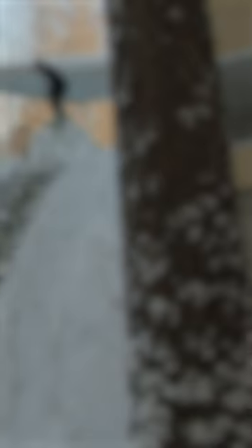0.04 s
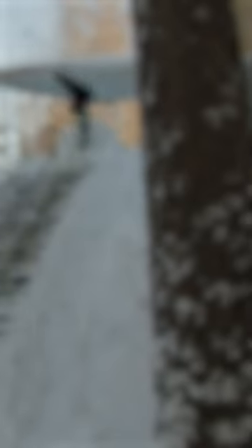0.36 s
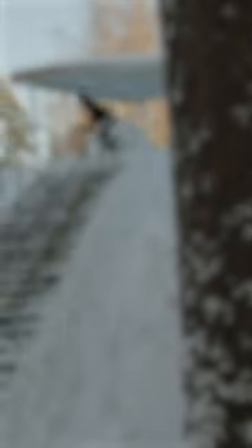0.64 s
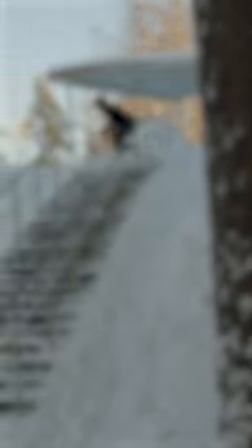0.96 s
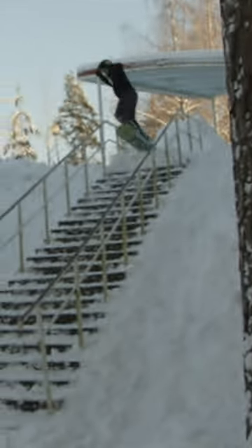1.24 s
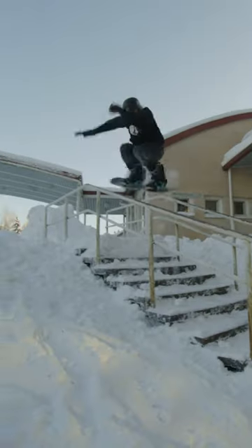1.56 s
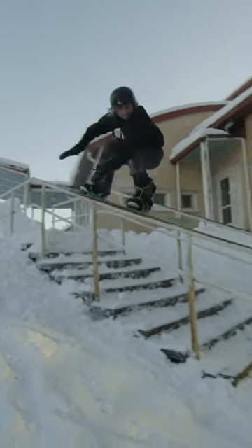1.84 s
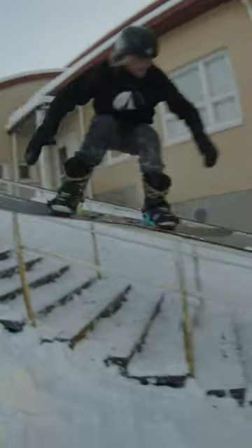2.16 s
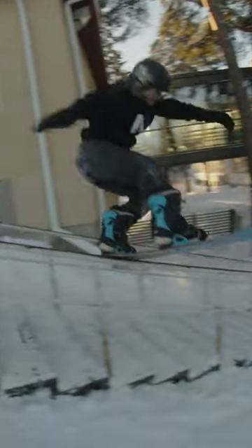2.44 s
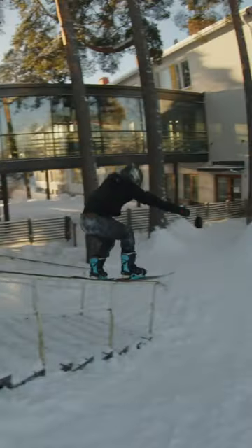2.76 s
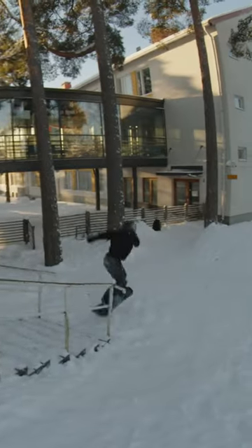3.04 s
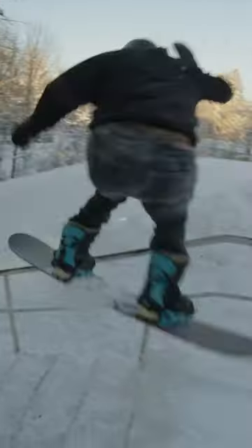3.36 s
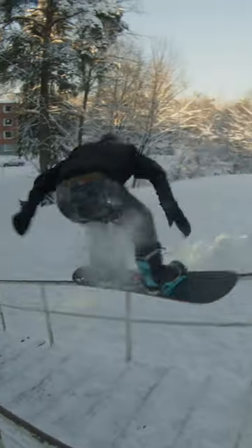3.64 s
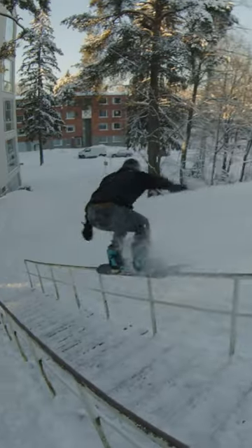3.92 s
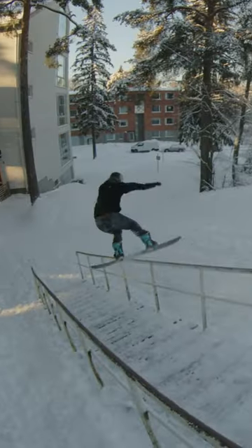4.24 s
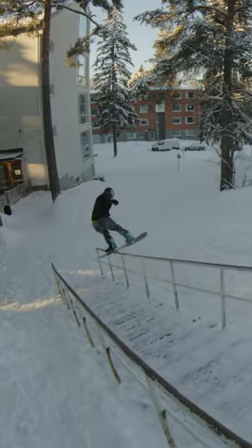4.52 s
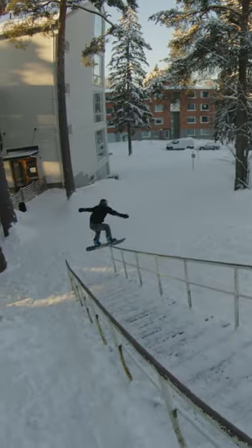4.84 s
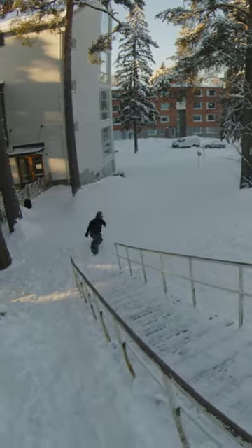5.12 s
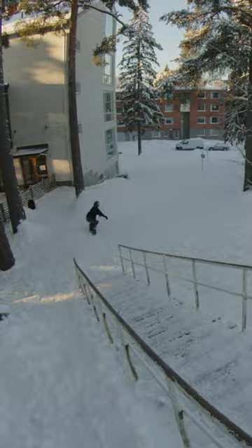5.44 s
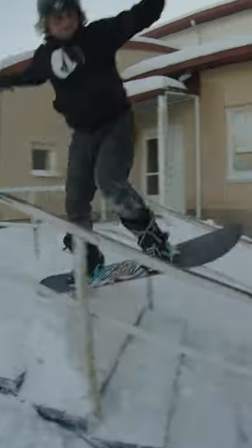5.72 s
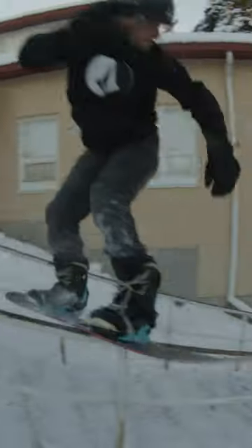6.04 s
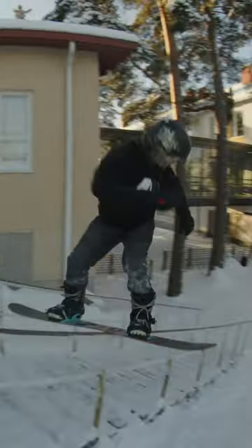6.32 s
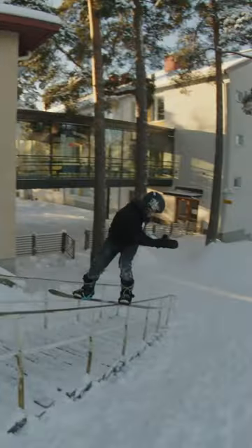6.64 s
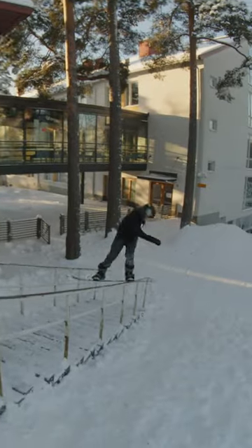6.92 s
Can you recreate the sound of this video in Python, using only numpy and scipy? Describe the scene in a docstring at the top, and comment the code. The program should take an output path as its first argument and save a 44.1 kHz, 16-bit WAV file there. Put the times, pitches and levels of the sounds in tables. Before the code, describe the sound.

A snowboard glides over snow and three times cracks onto a metal handrail and scrapes along it, twice thumping down into snow.

```python
"""A snowboarder at a steel stair handrail, heard from close by in stereo, outdoors in quiet winter air.
The board rides in over packed snow under a thin electronic whine, then cracks onto the tube, which
hums and rings while the base scrapes along it. Twice it thumps down into snow and glides away; then it
sweeps past on the ramp into a third slide. The nearest blows overload the microphone, and house fronts
give a faint echo."""
import sys
import numpy as np
from scipy import signal
from scipy.fft import rfft
from scipy.io import wavfile
from scipy.ndimage import uniform_filter1d, map_coordinates

SR = 44100
rng = np.random.default_rng(int(sys.argv[2]) if len(sys.argv) > 2 else 0)


def pcm_store(signal):
    """Save signal as 16-bit PCM."""
    levels = np.round(np.clip(np.atleast_2d(signal), -1, 1) * 32767)
    wavfile.write(sys.argv[1], SR, levels.astype(np.int16).T)


N = 312228
TIME = np.arange(N) / SR

# the ride in, with more spray as the board gathers speed and carves: time_s, glide_db, spray_db
RIDE_IN = [(0.07, -51, -69.5), (0.5, -50, -60.5), (0.6, -50.5, -49.5), (0.9, -52, -55.5),
           (1.15, -50.5, -51.5), (1.24, -50, -48.5), (1.31, -51, -57), (1.4, -53.5, -60),
           (1.57, -54.5, -62)]
# bending modes of the rail and rings of its wall: pitch_hz, level_db, t60_s
RAIL_MODES = [(104, 3, .55), (113.2, 5.5, .55), (154, 5, 0.15), (260.6, -21, 0.27), (408, -1, 0.36),
              (450, -4.5, 0.42), (516, -23, .5), (596, -6, 0.57), (1410, -21.5, .5), (1880, -7, 0.47),
              (2160, -9, 0.98), (2200, -16, 0.35), (2568, -8.5, 0.39), (3350, -10.5, 0.8),
              (3670, -9.5, 0.57), (4230, -6.5, 0.39), (4520, -11.5, 0.57), (4780, -4.5, .3)]


def undb(db):
    """Decibels to gain."""
    return 10 ** (np.asarray(db) / 20)


def unit(x):
    """Scale to rms 1."""
    return x / np.sqrt(np.mean(x ** 2))


def colour(x, points):
    """Filter by (freq_hz, gain_db) points joined on a log-frequency axis."""
    hz, db = np.transpose(points)
    bins = np.maximum(np.fft.rfftfreq(x.shape[-1], 1 / SR), 1)
    return np.fft.irfft(rfft(x) * undb(np.interp(np.log(bins), np.log(hz), db)), x.shape[-1])


def band(x, lo_hz, hi_hz, order=2):
    """Causal band-pass."""
    edges_hz = [lo_hz, min(hi_hz, SR / 2 - 100)]
    return signal.sosfilt(signal.butter(order, edges_hz, "band", fs=SR, output="sos"), x)


def resonance(x, hz, width_hz):
    """One resonance, gain 1 at its centre."""
    return signal.lfilter(*signal.iirpeak(hz, hz / width_hz, fs=SR), x)


def walk(rate_hz, size):
    """Random levels joined by straight lines; spread near 1."""
    hold = int(SR / rate_hz)
    steps = np.repeat(rng.standard_normal(size // hold + 1), hold)
    return 1.2 * uniform_filter1d(steps, hold)[:size]


def swell(t, rise_s):
    """An envelope that peaks at 1 after rise_s and then dies away."""
    return t / rise_s * np.exp(1 - t / rise_s)


def settle(age, settle_s):
    """Share of a fall that is complete after age seconds: an S-curve from 0 to 1."""
    return 1 - np.exp(-(age / settle_s) ** 1.77)


def follow(curve):
    """Join rows of (time_s, levels...) by straight lines; returns the times, then each level."""
    times, *columns = np.transpose(curve)
    t = np.linspace(times[0], times[-1], 400)
    return [t] + [np.interp(t, times, column) for column in columns]


def gain_curves(times, levels_db, fade_s):
    """Start time and one gain curve a layer, fading quickly at both ends."""
    start, end = times[0] - fade_s, times[-1] + fade_s
    t = TIME[(TIME > start) & (TIME < end)]
    gate = np.interp(t, [start, times[0], times[-1], end], [0, 1, 1, 0])
    return t[0], gate * undb([np.interp(t, times, db) for db in levels_db])


def add(out, start_s, sound):
    """Mix a sound in at start_s."""
    i = int(start_s * SR)
    out[..., i:i + sound.shape[-1]] += sound[..., :N - i]


def stereo(pair, left_db=0):
    """Mid and side become left and right: narrow bass, wide treble that is left_db louder on the left."""
    # width of the sound field: freq_hz, side_gain_db
    width = [(30, -10), (90, -47.5), (200, -23.5), (700, -14), (1300, -9.5), (2400, -5), (5000, -7),
             (15000, -7)]
    mid, side = pair[0], colour(pair[1], width)
    lean = np.array([(1200, 0), (3800, left_db / 2)])
    return np.array([colour(mid + side, lean), colour(mid - side, lean * [1, -1])])


def grains(per_s, spread_db, size):
    """Dense tiny impulses of unequal strength, as an unrelated pair."""
    strength = undb(spread_db * np.minimum(rng.exponential(size=(2, size)), 5))
    fires = rng.random((2, size)) < per_s / SR
    return unit(fires * strength * rng.standard_normal((2, size)))


def shifting(x, depth_db, spacing_hz=170, hold_s=0.06006):
    """The contact point travels, so the resonances that it reaches keep changing."""
    hz, t, spectrum = signal.stft(x, SR, nperseg=1024)
    grid = np.meshgrid(hz / spacing_hz, t / hold_s, indexing="ij")
    peaks = map_coordinates(rng.standard_normal((512, 128)), grid, order=1, mode="mirror")
    return signal.istft(spectrum * undb(depth_db * peaks), SR)[1][:, :x.shape[-1]]


def winter_air(level_db=-59):
    """A quiet hush all round the microphone, its level drifting by about a decibel."""
    # spectrum of the air: freq_hz, gain_db
    spectrum = [(15, -27.5), (25, 6.5), (149, -0.5), (840, -7.5), (1440, -7), (1610, -8.5), (3620, -11),
                (5280, -13), (7920, -20), (11600, -32), (16000, -12.5)]
    hush = unit(colour(grains(per_s=9200, spread_db=3.0, size=N), spectrum))
    return stereo(hush, left_db=5.0) * undb(level_db + walk(1.95, N))


def whine(pitch_hz=15690, level_db=-66):
    """A thin, very high electronic whine during the ride in."""
    return undb(level_db) * unit(np.sin(2 * np.pi * pitch_hz * TIME)) * (TIME < RIDE_IN[-1][0])


def house_echo(x, gain_db=-23, t60_s=0.37, build_s=0.16):
    """House fronts and trees scatter a weak echo back to the microphone."""
    t = TIME[:SR]
    echo = rng.standard_normal((2, SR)) * np.minimum(t / build_s, 1) ** 2 * 1000 ** (-t / t60_s)
    echo = colour(echo / np.linalg.norm(echo[0]), [(100, 3.5), (2500, -13), (6000, 3.5), (14000, -16)])
    return undb(gain_db) * signal.fftconvolve(x.mean(axis=0)[None], stereo(echo), axes=1)[:, :N]


def snow(times, levels_db, spectrum, left_db, per_s, spread_db, flutter_db):
    """Crystals crush under the base; bumps in the track shake the board and make the sound flutter."""
    start, (rumble, crunch, rush, spray) = gain_curves(times, levels_db, fade_s=0.006)
    n = len(rush)
    crush = colour(shifting(grains(per_s, spread_db, 2 * SR), depth_db=2.5), spectrum)[:, :n]
    bumps = undb(flutter_db * walk(58, 2 * SR))[:n]
    layers = [(rumble, 20, 200), (crunch, 200, 1000), (rush, 1000, 3000), (spray, 3000, 17000)]
    glide = sum(gain * unit(band(crush, lo_hz, hi_hz, order=3)) for gain, lo_hz, hi_hz in layers)
    return start, stereo(bumps * glide, left_db)


def ride_in(out):
    """On packed snow, rumble, crunch and rush follow the glide; the spray has its own course."""
    # packed snow under the base: freq_hz, gain_db
    spectrum = [(15, -26), (25, -1), (115, -8.5), (344, -7.5), (394, -6), (543, -10.5), (655, -7.5),
                (1540, -5.5), (2430, -11.5), (2850, -12.5), (4750, -7), (7090, -19.5), (8100, -28.5),
                (15000, -32)]
    t, glide, spray = follow(RIDE_IN)
    levels_db = [glide - 0.5, glide + 1, glide, spray]
    add(out, *snow(t, levels_db, spectrum, left_db=4.5, per_s=7500, spread_db=1.0, flutter_db=-0.23))


def touchdowns(out, settle_s=0.17):
    """Snow bursts out under the landing board and settles to a glide, the bass falling furthest."""
    # landings and their first levels: start_s, end_s, rumble_db, crunch_db, rush_db, spray_db, left_db
    landings = [(3.197, 3.496, -38.5, -42.5, -47, -47, 1.5), (5.111, 5.502, -41, -45, -46, -42, 2.5)]
    # thrown snow, one spectrum a landing: freq_hz, gain_db
    spectra = [
        [(10, -28), (30, -10), (90, 0), (300, -2.5), (600, -7.5), (1400, -16.5), (2800, -18), (6500, -10),
         (8000, -17.5), (10800, -36), (14500, -15), (16000, -21)],
        [(10, -27), (30, -10), (140, 4.5), (330, -7.5), (700, -14), (2100, -18), (3800, -8), (5500, -16.5),
         (7200, -26.5), (11000, -38), (14500, -21.5), (16000, -31)],
    ]
    falls_db = (27.3, 18.3, 10.7, 12.6)  # rumble, crunch, rush, spray
    for (start_s, end_s, *first_db, left_db), spectrum in zip(landings, spectra):
        t = np.linspace(start_s, end_s, 400)
        levels_db = [db - fall * settle(t - start_s, settle_s) for db, fall in zip(first_db, falls_db)]
        add(out, *snow(t, levels_db, spectrum, left_db, per_s=7500, spread_db=-0.5, flutter_db=0.65))


def ramp_pass(out, rumble_db=-53):
    """The board sweeps close past the microphone: crunch and rush swell with the spray, rumble holds."""
    # the pass on the ramp: time_s, spray_db
    sweep = [(5.42, -61), (5.515, -51.5), (5.535, -39.5), (5.635, -35), (5.72, -42.5), (5.785, -39.5),
             (5.835, -53.5)]
    # snow on the ramp: freq_hz, gain_db
    spectrum = [(10, -35), (30, -13), (150, -1.5), (460, 0.5), (1500, -6.5), (2100, 0), (2800, -10.5),
                (4900, -8.5), (7500, -17), (11000, -33.5), (14800, -18), (16000, -24)]
    t, spray = follow(sweep)
    levels_db = [np.full_like(t, rumble_db), spray - 10, spray - 3.5, spray]
    add(out, *snow(t, levels_db, spectrum, left_db=3.0, per_s=6700, spread_db=-0.5, flutter_db=1.5))


def swishes(out, swell_db=11.5):
    """The board swishes in towards the rail with hardly any weight on the snow."""
    # approaches to the rail: start_s, loudest_s, end_s, rush_db
    approaches = [(1.561, 1.66, 1.734, -56.5), (3.413, 3.51, 3.58, -43), (5.9, 6.022, 6.03, -50.5)]
    # lightly brushed snow: freq_hz, gain_db
    spectrum = [(10, -25), (30, -2), (250, -29), (1000, -10), (1900, -1.5), (3200, -5.5), (7000, -12),
                (11000, -31), (15000, -16)]
    for start_s, loudest_s, end_s, db in approaches:
        t, rush = follow([(start_s, db - swell_db), (loudest_s, db), (end_s, db - swell_db)])
        levels_db = [rush - 22, rush - 11.5, rush, rush - 4]
        add(out, *snow(t, levels_db, spectrum, left_db=1.5, per_s=6000, spread_db=3.5, flutter_db=1.5))


def ticks(gain_db=1, fall_s=0.0029, width_hz=4500):
    """Ice crumbs and bindings click: small hard contacts, gone in a few milliseconds."""
    # clicks: start_s, level_db, pitch_hz
    contacts = [(0.999, -51, 1800), (1.316, -53, 4500), (1.427, -63, 3000), (1.668, -49, 3000),
                (1.7097, -46.5, 3200), (1.7402, -45, 3600), (1.782, -48.5, 2000), (4.0708, -36.5, 4230),
                (4.3515, -31.5, 4430), (5.057, -47.5, 3660), (5.85, -37.5, 1880)]
    # tone shared by all clicks: freq_hz, gain_db
    spectrum = [(100, -9), (1000, 1), (5500, -5.5), (10500, -11), (15000, -2.5)]
    out, t = np.zeros((2, N)), TIME[:SR // 20]
    for start_s, db, hz in contacts:
        click = colour(resonance(rng.standard_normal((2, len(t))), hz, width_hz), spectrum)
        add(out, start_s, undb(db + gain_db) * np.exp(-t / fall_s) * unit(click))
    return stereo(out, left_db=4.5)


def edge_bites():
    """The edge catches in snow or steel, rasps or squeals in one range and lets go."""
    # catches of the edge: start_s, level_db, pitch_hz, width_hz, rise_s
    catches = [(.56, -50, 4550, 2200, 0.017), (.825, -43, 690, 300, 0.012), (.945, -48, 700, 900, 0.011),
               (1.031, -45.5, 1700, 900, 0.013), (1.19, -44, 4150, 1940, 0.03),
               (1.2, -44.5, 1950, 1600, 0.036), (1.337, -37, 2240, 2000, 0.0088),
               (1.529, -52, 5340, 590, 0.0071), (1.543, -46, 4740, 600, 0.0044),
               (2.394, -33, 2150, 1500, 0.011), (2.789, -57, 4760, 160, 0.044), (2.9, -70, 4560, 60, 0.13),
               (3.026, -38, 2600, 5000, 0.007), (3.024, -43.5, 634, 446, 0.011),
               (3.093, -43, 4180, 2400, 0.005), (4.19, -41.5, 1000, 825, 0.019),
               (4.87, -32.5, 4100, 2125, 0.0048), (4.867, -45, 1680, 600, 0.0074),
               (5.528, -37, 920, 1290, 0.017), (6.119, -48, 4290, 160, 0.038), (6.53, -51, 1880, 600, 0.03)]
    out, t = np.zeros((2, N)), TIME[:SR // 2]
    for start_s, db, hz, width_hz, rise_s in catches:
        rasp = resonance(resonance(rng.standard_normal((2, len(t))), hz, width_hz), hz, width_hz)
        add(out, start_s, undb(db) * swell(t, rise_s) * unit(rasp))
    return stereo(out, left_db=5.0)


def thumps(thud_db=-1, slap_db=-9, thud_rise_s=0.0042, slap_fall_s=0.012):
    """The flat base slaps down and the rider's weight arrives with a dull thud."""
    # drops onto snow or rail: start_s, level_db, extra_slap_db, thud_hz
    drops = [(1.439, -37, 9.5, 415), (1.456, -41, 6.5, 325), (1.989, -29, -13, 102),
             (3.189, -27.5, 6.5, 182), (3.207, -28.5, 7, 70.5), (3.224, -28.5, -8, 120.2),
             (3.237, -24, -9.5, 156), (5.107, -36.5, 6, 140), (5.173, -20, -9.5, 75),
             (6.085, -23, -14, 106), (6.125, -36, -12, 155)]
    # slap of the base: freq_hz, gain_db
    spectrum = [(20, -46), (100, -11.5), (300, 0.5), (600, -6), (1200, -4.5), (2200, -11), (5000, -25),
                (10000, -36), (15000, -42.5)]
    out, t = np.zeros((2, N)), TIME[:SR // 5]
    for start_s, db, extra_slap_db, hz in drops:
        slap = unit(colour(rng.standard_normal((2, len(t))), spectrum)) * np.exp(-t / slap_fall_s)
        thud = swell(t, thud_rise_s) * np.sin(2 * np.pi * hz * t)
        add(out, start_s, undb(db + extra_slap_db + slap_db) * slap)
        add(out[0], start_s, undb(db + thud_db) * thud)
    return stereo(out)


def rail_ring():
    """The tube's answer to a unit tap; neighbouring modes swing in opposite senses."""
    t = TIME[:SR]
    return sum((-1) ** k * undb(db - 60 * t / t60) * np.sin(2 * np.pi * hz * t)
               for k, (hz, db, t60) in enumerate(RAIL_MODES))


def tube_hum(slips, width_hz=9):
    """The slips keep the three lowest bending modes swinging."""
    return unit(sum(undb(db) * resonance(resonance(slips, hz, width_hz), hz, 2 * width_hz)
                    for hz, db, _ in RAIL_MODES[:3]))


def steel_scrape(times, levels_db, spectrum, left_db, ring_db=-12, chatter_db=0.73, rumble_db=-9):
    """The base sticks and slips on rough steel; the slips rattle the board and ring the tube."""
    start, (hum, growl, scrape, hiss) = gain_curves(times, levels_db, fade_s=0.011)
    n = len(scrape)
    slips = grains(per_s=7000, spread_db=-1.5, size=2 * SR) * undb(chatter_db * walk(110, 2 * SR))
    ring = signal.fftconvolve(slips, rail_ring()[None], axes=1)[:, :2 * SR]
    rattle = unit(shifting(slips, depth_db=4.0))
    steel = colour(rattle + undb(ring_db) * unit(ring), spectrum)[:, -n:]
    bending = (tube_hum(slips) + undb(rumble_db) * unit(band(slips, 40, 170)))[:, -n:]
    # the rider's weight holds the swing of the tube fairly even
    bending = bending / np.sqrt(uniform_filter1d(bending ** 2, SR // 12, axis=1))
    layers = [(growl, 200, 1000), (scrape, 1000, 3000), (hiss, 3000, 17000)]
    rub = sum(gain * unit(band(steel, lo_hz, hi_hz, order=3)) for gain, lo_hz, hi_hz in layers)
    return start, stereo(rub + hum * bending, left_db)


def rail_slides(out, hum_fall_db=20, growl_fall_db=15.5, growl_follows=0.32):
    """Pressure sets the scrape; the landing's hum and growl die down and each slide thins to a hiss."""
    # how hard the base bears on the rail, one curve a slide: time_s, scrape_db
    pressures = [
        [(1.865, -38.5), (2.165, -44.5), (2.21, -37), (2.32, -38.5), (2.435, -40), (2.455, -48.5),
         (2.495, -40.5), (2.76, -50), (2.83, -46), (3.0, -47.5), (3.11, -55.5)],
        [(3.665, -41.5), (3.92, -41), (4.15, -49), (4.24, -46.5), (4.44, -47), (4.56, -53.5), (4.7, -49.5),
         (4.88, -57.5), (4.98, -67)],
        [(6.06, -36.5), (6.14, -37.5), (6.2, -39.5), (6.26, -45), (6.35, -41.5), (6.46, -50.5), (6.57, -41),
         (6.67, -47.5), (6.86, -46.5), (7.08, -55)],
    ]
    # each slide on landing: hum_db, growl_db, hiss_above_scrape_db, hiss_rise_db_per_s, left_db
    slides = [(-44, -43.5, -5, 6.2, 1.5), (-45.5, -44.5, -8, 12.5, 3.5), (-44, -48, -3.5, 4.3, 1.2)]
    # base on steel, one spectrum a slide: freq_hz, gain_db
    spectra = [
        [(120, -45), (200, 1.5), (249, -12.5), (353, -11), (409, -9), (671, -9.5), (1160, -6.5), (1270, -3.5),
         (1450, -6), (2290, -4), (3900, -2.5), (4770, 1), (10900, -21), (14900, -10.5), (16000, -14)],
        [(120, -35.5), (200, 5), (328, -8.5), (529, -5.5), (647, -3), (777, -11), (933, -5), (1620, -1.5),
         (2250, 0.5), (3020, -6), (3620, -3), (5730, -8.5), (10900, -31), (12800, -22), (16000, -17)],
        [(120, -40), (200, -1.5), (360, -13.5), (500, -1.5), (777, -4.5), (933, -7), (1020, -7), (1620, -5),
         (2170, -1.5), (3900, -9), (4350, -7), (6170, -11.5), (10700, -33), (14900, -18), (16000, -29)],
    ]
    for pressure, slide, spectrum in zip(pressures, slides, spectra):
        hum_db, growl_db, hiss_above_db, hiss_rise_db_per_s, left_db = slide
        t, scrape = follow(pressure)
        age = t - t[0]
        hum = hum_db - hum_fall_db * settle(age, settle_s=0.45)
        growl = growl_db - growl_fall_db * settle(age, settle_s=0.59)
        growl += growl_follows * (scrape - scrape[0])
        hiss = scrape + hiss_above_db + hiss_rise_db_per_s * age
        add(out, *steel_scrape(t, [hum, growl, scrape, hiss], spectrum, left_db))


def board_crack(flex_hz, bass_db, treble_db, length_db, front_db=14, tail_db=-25, flex_db=-3):
    """A crack spreads as bending waves: a clean front, then scatter; treble arrives and dies first."""
    # board striking steel: freq_hz, gain_db
    spectrum = [(30, -22.5), (110, -10.5), (240, 0), (330, -9.5), (500, 4), (780, 1.5), (1200, 5),
                (2300, 6.5), (3300, -2), (4300, 0.5), (7000, -19.5), (10000, -34), (15500, -22.5)]
    hz_points, db_points = np.transpose(spectrum)
    plain_t60_s, plain_rise_s, lag_s, tail_t60_s = 0.037, 0.0013, 0.0018, 0.21
    t, crack = TIME[:SR // 4], 0
    for hz in 50 * 2 ** (np.arange(26) / 3):  # third-octave bands
        khz = max(hz, 350) / 1000
        age = t - lag_s * (khz ** -0.5 - 1 / 4)
        t60 = plain_t60_s * undb(length_db) * khz ** -0.14
        tail = undb(tail_db) / khz ** 0.5 * 1000 ** (-t / tail_t60_s)
        envelope = (age >= 0) * (1000 ** (-np.abs(age) / t60) + tail)
        push = rng.standard_normal((2, len(t))) * envelope
        push[0, np.argmax(age >= 0)] += undb(front_db) / khz ** 0.5
        wave = band(push, hz / 2 ** (1 / 5), hz * 2 ** (1 / 5))
        wave /= np.linalg.norm(wave, axis=1, keepdims=True)
        band_db = np.interp(np.log(hz), np.log(hz_points), db_points)
        tilt_db = np.interp(np.log2(khz), [-1.5, 0.5, 1.5, 2.5], [bass_db, 0, 0, treble_db])
        crack = crack + undb(band_db + tilt_db) * np.sqrt(hz) * wave
    # one heavily damped flex of the board gives each strike its clack
    flex = swell(t, plain_rise_s * undb(length_db / 2)) * np.sin(2 * np.pi * flex_hz * t)
    attack = slice(SR // 100)
    crack /= crack[0, attack].std()
    crack[0] += undb(flex_db) * flex / flex[attack].std()
    return crack


def rail_blows(crack_db=-4, side_db=-3, ring_db=-44.5, ring_follows=0.3):
    """Every strike on the rail gives a crack and leaves the tube ringing."""
    # strikes: start_s, level_db, flex_hz, bass_db, treble_db, length_db (re a plain blow)
    strikes = [(1.8481, -14, 4100, 12.5, 10.5, -10.5), (1.851, -19, 3560, 2, 6, -2),
               (1.871, -27.5, 2930, 15, 11, 11.5), (1.9403, -30.5, 1920, 14, 5, -10),
               (1.9771, -28, 965, 11, 3, 4), (2.355, -33, 2300, 9.5, -2, 8), (3.6413, -8, 2320, 9, 6, -2.5),
               (3.662, -26.5, 3400, 23, 11, 2), (3.7001, -0.5, 2346, 0.5, 5.5, -3.5),
               (3.715, -8.5, 1335, 6, 5, 1.5), (3.736, -29, 910, 3, 13, 3), (3.787, -32, 2600, -25, 1, 14),
               (6.0492, -22.5, 1620, 8, 5, -21), (6.0514, -18, 1500, -5, -2, -9.5),
               (6.0763, -22.5, 1780, 7.5, -3, 5), (6.0802, -19.5, 1053, 4, -6, 4.5),
               (6.088, -34, 530, 2, -4, 13)]
    out, ring = np.zeros((2, N)), rail_ring()
    for start_s, db, *timbre in strikes:
        add(out, start_s, undb(db + crack_db) * board_crack(*timbre))
        # the board damps the tube it lands on, so a harder blow rings only a little louder
        add(out[0], start_s, undb(ring_db + ring_follows * db) * ring)
    out[1] *= undb(side_db)
    return stereo(out, left_db=2.0)


def scene(start_s=0.07):
    """Air, snow and rail as they reach the microphone; only the short sounds get an echo."""
    out = winter_air() + whine()
    ride_in(out)
    touchdowns(out)
    ramp_pass(out)
    swishes(out)
    rail_slides(out)
    hits = rail_blows() + thumps() + ticks() + edge_bites()
    fade_in = np.interp(TIME, [start_s - 0.005, start_s + 0.0021], [0.03, 1])
    return (out + hits + house_echo(hits)) * fade_in


def record(dry):
    """The loudest cracks overload the microphone and flatten against full scale; the top is cut."""
    top_hz = 15900
    clipped = dry / (1 + dry ** 6) ** (1 / 6)
    return signal.sosfilt(signal.ellip(8, 0.2, 70, top_hz, fs=SR, output="sos"), clipped)


dry = scene()
out = record(dry)
pcm_store(out)
```